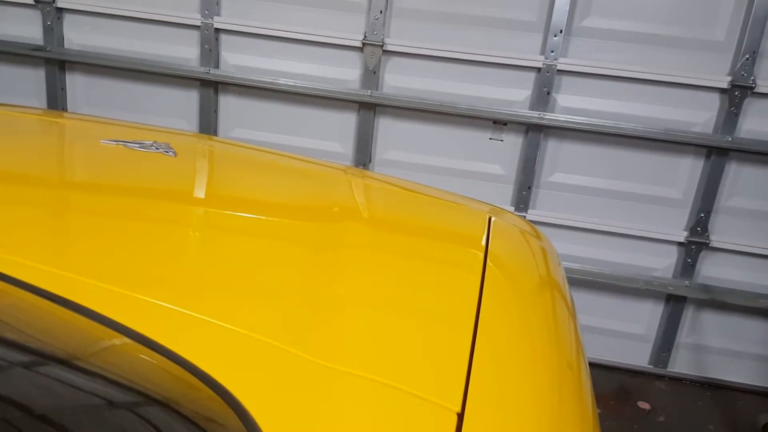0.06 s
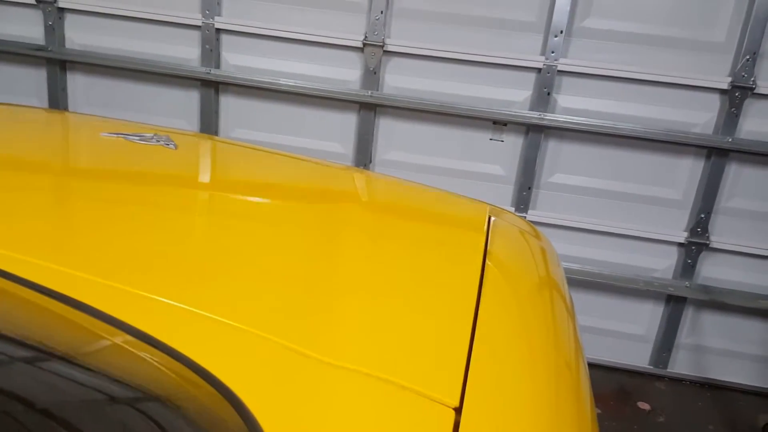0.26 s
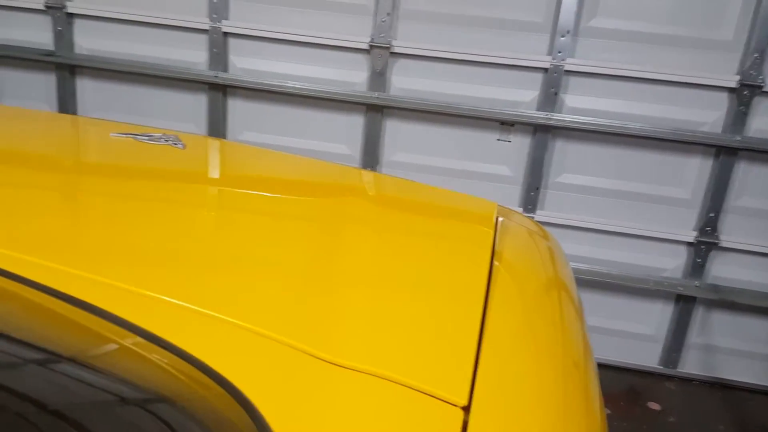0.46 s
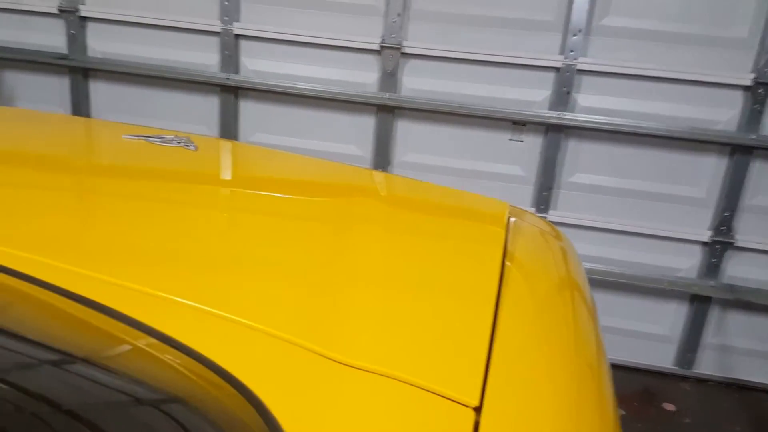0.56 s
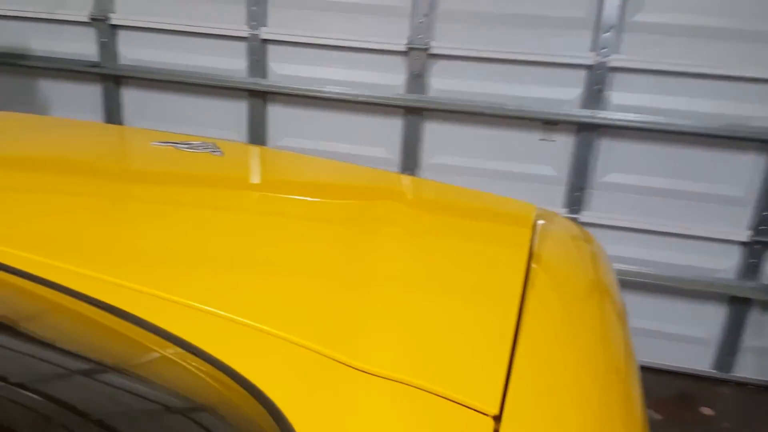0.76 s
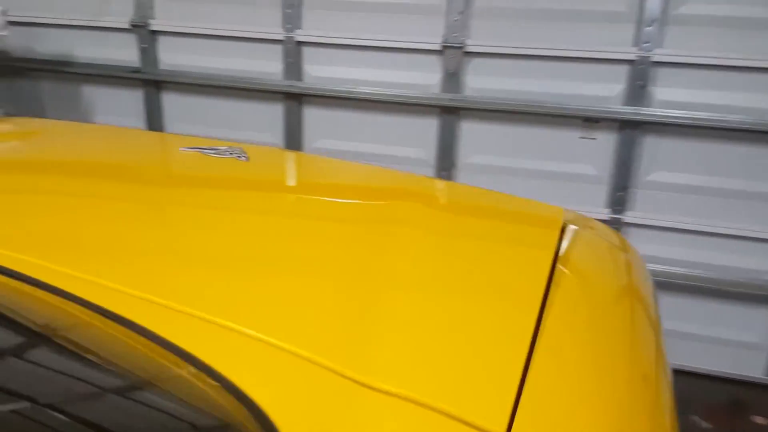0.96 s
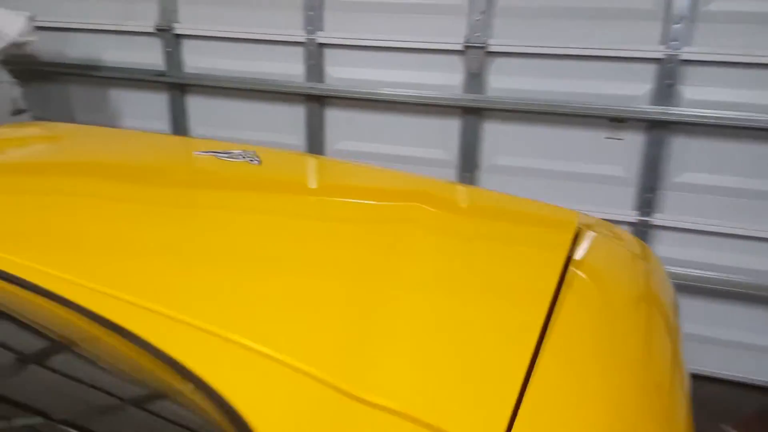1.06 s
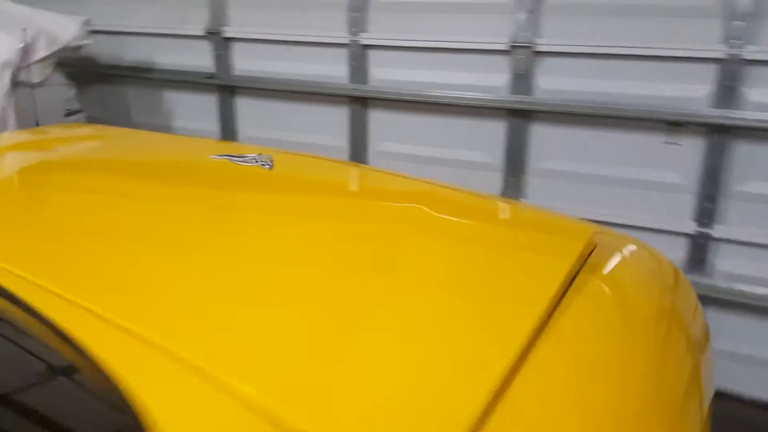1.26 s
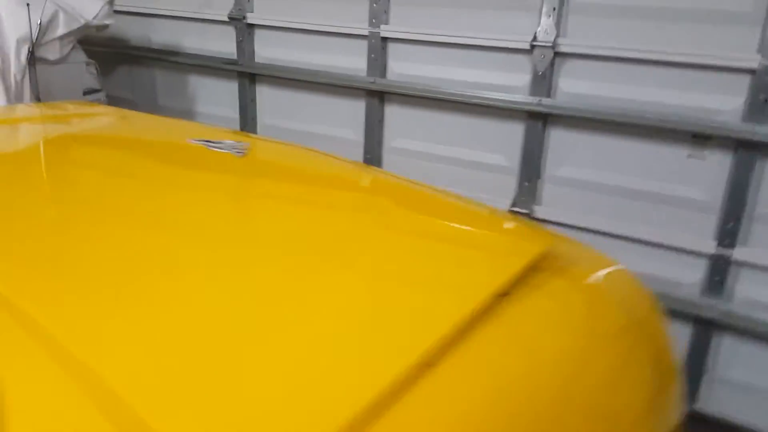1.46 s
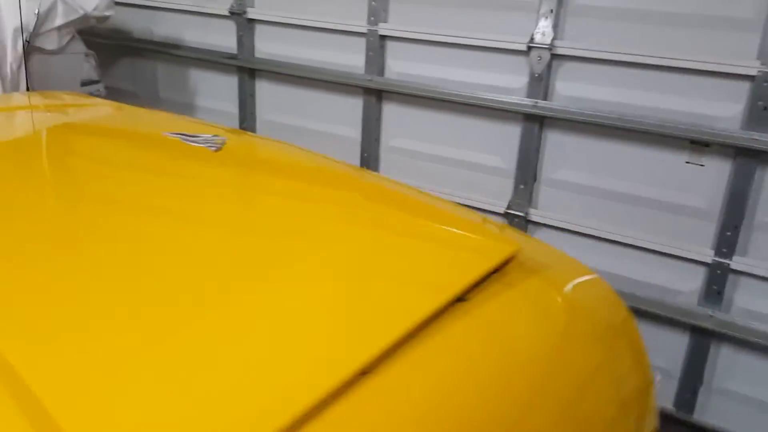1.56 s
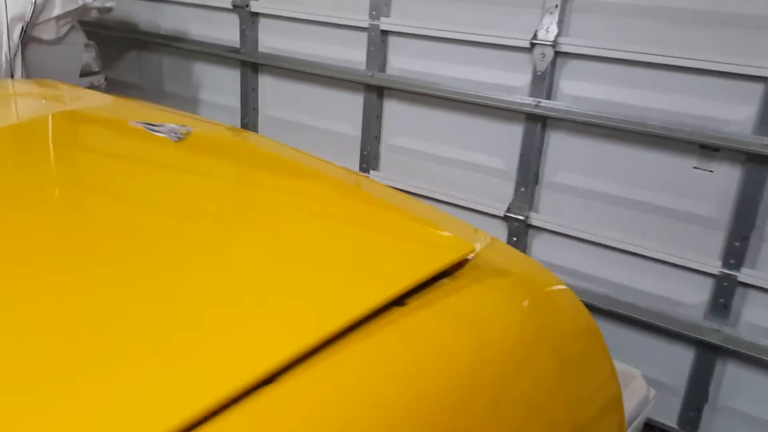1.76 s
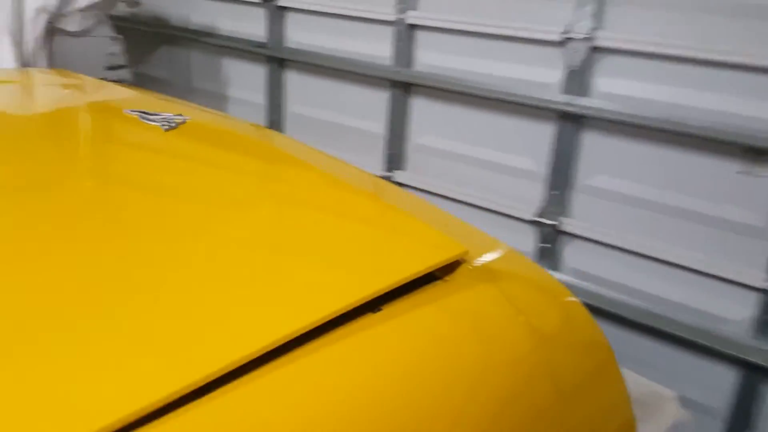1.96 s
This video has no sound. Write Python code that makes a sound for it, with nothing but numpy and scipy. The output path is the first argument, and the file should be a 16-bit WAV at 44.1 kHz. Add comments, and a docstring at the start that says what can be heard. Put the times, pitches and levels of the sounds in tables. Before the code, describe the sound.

A car trunk pops with a ringing metal clunk just after a brief electric whir. A few light taps and a second whir follow, echoing slightly in the garage, then only a low hum and faint clothing rustle.

```python
"""A car's trunk is released by its electric latch in a closed, quiet garage.
Over a low hum and a thin hiss, a relay ticks and a small geared motor pulls the latch.
The steel catch snaps open; the sheet-metal lid knocks and rings, and the trunk's air booms.
As the lid settles with a few taps, the gears run back. Then the hum swells, clothes rustle
faintly, and near the end the hiss stops with a click."""
import sys
import numpy as np
from scipy import signal
from scipy.fft import rfft, irfft
from scipy.io import wavfile

SR = 44100
rng = np.random.default_rng(int(sys.argv[2]) if len(sys.argv) > 2 else 0)


def wav_out(sig):
    """Save sig, one row per channel (or a flat mono array), as 16-bit PCM at SR to the path in sys.argv[1]."""
    wavfile.write(sys.argv[1], SR, np.round(np.clip(np.atleast_2d(sig).T, -1, 1) * 32767).astype(np.int16))


N = 88200
T = np.arange(N) / SR
BIN_HZ = np.arange(N // 2 + 1) * SR / N
LATCH_CHATTER_S = 0.0079


def catch():
    """Impact excitation: the steel catch snaps and rings; its cracks come mostly off the walls."""
    # snaps of the catch: start_s, level_db
    snaps = [(.240, -6.5), (.2465, -3.5), (.252, -2), (.2625, -2), (.280, -5.5)]
    # spectrum of a snap: frequency_hz, gain_db
    snap_colour = [(40, 7.5), (100, 24), (250, 8.5), (900, 11.5), (1200, 4), (2600, 4), (4300, -5.5),
                   (5300, -12.5), (6200, -4.5), (7000, -16), (7700, -4.5), (8500, -13.5), (9200, -21),
                   (12000, -21), (16000, -30.5)]
    # modes of the catch: pitch_hz, level_db, t60_s
    modes = [(1846, -45.5, 0.25), (2228, -46, 0.22), (2565, -40, 0.42), (2610, -44.5, .3),
             (3434, -44.5, 0.19), (4065, -54, 0.316), (6200, -65.5, 0.34), (7440, -58.5, .2)]
    crack = coloured(clicks(snaps), snap_colour)
    release = clicks([(snaps[1][0], 0)])  # the second snap excites the modes
    # each mode is slightly unequal in the two ears
    rings = sum(ringing(release, [mode]) * from_db(-0.5 * rng.standard_normal((2, 1))) for mode in modes)
    return from_db(-3.5) * chatter(crack, LATCH_CHATTER_S) + rings + garage(crack)


def lid():
    """Plate vibration: dull knocks against the stops set the sheet metal ringing in its modes."""
    # knocks of the lid: start_s, level_db, pitch_hz
    knocks = [(.2398, -19, 350), (.2465, -10.5, 780), (.2555, -19, 230), (.2612, -17, 390),
              (.277, -22, 200), (.2815, -15, 260), (.2955, -20, 410), (.322, -26, 560)]
    # modes of the panel: pitch_hz, relative_level_db, t60_s
    modes = [(92, -13, 0.22), (128.6, -21, 0.16), (194, -22, .3), (212, -24.5, 0.9), (314.4, -41.5, .4),
             (368, -29, 0.21), (445, -14.5, 0.17), (499.5, -13, 0.15), (620, -15.5, 0.27), (671, -26, 0.38),
             (808, -30, .3), (882, -31, .3)]
    t60_cycles, dull_above_hz = 5.6, 1310
    thuds = -sum(ring(clicks([(s, db)]), hz, t60_cycles / hz) for s, db, hz in knocks)
    thuds = signal.sosfilt(signal.butter(2, dull_above_hz, fs=SR, output="sos"), thuds)
    blows = clicks([(s, db) for s, db, hz in knocks])
    panel = -from_db(-6.5) * ringing(blows, modes)
    return thuds + panel + from_db(-3.5) * garage(thuds)


def trunk_boom():
    """Cavity resonance: the trunk's air booms as the seal lets go."""
    start_s, rise_s = .2445, 0.015
    swell = 1 - np.exp(-np.maximum(T - start_s, 0) / rise_s)
    return swell * ring(clicks([(start_s, -19.5)]), hz=59.5, t60_s=0.49)


def lid_taps():
    """Light impacts: the lid settles on its struts, and the garage reflects each tap."""
    # taps of the lid: start_s, level_db
    taps = [(.421, -12.5), (.464, -15.5), (.497, -9), (.545, -11.5), (.563, -11), (.851, -29)]
    # spectrum of a tap: frequency_hz, gain_db
    tap_colour = [(60, 1), (250, 7), (600, 2), (1000, 11), (1300, 2.5), (1700, -13), (3000, -28),
                  (15000, -53)]
    strikes = coloured(clicks(taps), tap_colour)
    return chatter(strikes, decay_s=.011) + from_db(-7) * garage(strikes)


def motor_pull():
    """Forced vibration: the gears shake their housing as the motor pulls the latch."""
    # effort of the pull: time_s, level_db
    effort = [(.166, -70), (.181, -42), (.204, -33.5), (.225, -35), (.245, -35), (.3, -83.5)]
    # response of the housing: frequency_hz, relative_gain_db
    colour = [(50, -16), (110, -0.5), (190, -1), (340, 8), (570, -4.5), (900, 10), (1300, -0.5), (2000, 3),
              (2700, 1.5), (4000, -17), (6000, -22), (8200, -35), (10000, -38), (16000, -42)]
    # modes of the housing: pitch_hz, gain_db, t60_s
    modes = [(329, -42, 0.063), (938, -27.5, 0.036), (2565, -36, 0.036)]
    return gears(effort, colour, modes, full_teeth_per_s=900)


def motor_return():
    """Forced vibration at a lower tooth rate: the gears run back."""
    # effort of the return: time_s, level_db
    effort = [(.5, -85), (.545, -50), (.572, -39), (.605, -40), (.635, -36), (.665, -39), (.71, -47),
              (.8, -74.5), (.83, -88)]
    # response of the housing: frequency_hz, relative_gain_db
    colour = [(40, -3), (70, 4.5), (200, 2), (320, 6.5), (420, -2), (560, -0.5), (900, 3), (1150, -1.5),
              (1350, 2), (1550, -1.5), (2100, 2.5), (2700, 1), (4300, -13), (6200, -18), (8200, -23),
              (9500, -36.5), (12000, -28.5), (16000, -50)]
    # modes of the housing: pitch_hz, gain_db, t60_s
    modes = [(301.4, -38, 0.072), (860, -36, 0.043), (1378, -34, 0.17), (1405, -45, 0.038)]
    return gears(effort, colour, modes, full_teeth_per_s=670)


def gears(effort_curve, colour, modes, full_teeth_per_s):
    """Gear mesh: teeth click unevenly over friction; effort makes them faster, louder and brighter."""
    rate_jitter, tooth_spread_db, friction_share, dull_above_hz = .2, 6, 0.46, 1300
    gain = level(effort_curve) * (T > effort_curve[0][0]) * (T < effort_curve[-1][0])
    effort = gain / gain.max()
    teeth_per_s = full_teeth_per_s * np.sqrt(effort) * (1 + rate_jitter * drift(700))
    teeth = np.diff(np.floor(np.cumsum(teeth_per_s) / SR), prepend=0)  # one impulse per tooth
    teeth *= from_db(tooth_spread_db * np.clip(rng.standard_normal(N), -2, 2))
    teeth *= rng.choice([-1, 1], N)
    friction = friction_share * rng.standard_normal(N)
    drive = gain * (.5 * np.sqrt(SR / full_teeth_per_s) * teeth + friction)
    dull = signal.sosfilt(signal.butter(1, dull_above_hz, fs=SR, output="sos"), drive)
    drive = dull + effort ** .6 * (drive - dull)  # the treble follows the effort
    impulse_response = coloured(clicks([(0, 0)]), colour)
    housing = coloured(drive, colour) / np.linalg.norm(impulse_response)
    return from_db(-0.5) * chatter(housing, LATCH_CHATTER_S) + garage(housing) + ringing(drive, modes)


def relay():
    """Free vibration: the relay that starts the motor rings after one impact."""
    # modes of the relay: pitch_hz, level_db, t60_s
    modes = [(657, -61, 0.079), (2970, -57, .08), (3314, -55.5, .06)]
    return ringing(clicks([(.1225, 0)]), modes)


def small_ticks():
    """Broadband transients: light ticks as the latch works, and one faint late tick amid the rustling."""
    # light ticks: start_s, level_db
    ticks = [(.1225, -30), (.463, -28), (.4945, -25.5), (.5612, -19), (1.678, -40.5)]
    # spectrum of a tick: frequency_hz, gain_db
    tick_colour = [(60, 17.5), (200, 15.5), (800, 8.5), (1800, 5), (3400, 5.5), (6000, -3), (8200, -4),
                   (10000, -15), (16000, -17)]
    strikes = coloured(clicks(ticks), tick_colour)
    return chatter(strikes, decay_s=0.0038) + from_db(3.5) * garage(strikes)


def clothes():
    """Friction noise: someone moves beside the car, with short rustles over a soft shuffle."""
    # rustles of cloth: centre_s, half_width_s, level_db
    rustles = [(1.396, 0.042, -65), (1.538, 0.035, -69), (1.677, 0.018, -77), (1.97, 0.03, -71)]
    # spectrum of a rustle: frequency_hz, relative_density_db
    rustle_colour = [(100, 0), (600, -24), (1900, 6), (5000, 0), (8200, 6.5), (10000, -6.5), (13000, 0.5),
                     (16000, -24)]
    # swell of the shuffle: time_s, level_db
    shuffle_level = [(1.1, -84.5), (1.35, -68.5), (1.5, -71), (1.68, -63.5), (1.85, -67), (2, -68.5)]
    # spectrum of the shuffle: frequency_hz, relative_density_db
    shuffle_colour = [(60, -3), (230, 3.5), (450, -7.5), (1800, -4), (4000, -13), (8000, -21.5),
                      (15000, -27.5)]
    swells = sum(from_db(db) * np.exp(-((T - s) / width) ** 2) for s, width, db in rustles)
    grain = from_db(2.36 * drift(120))
    return grain * (swells * noise(rustle_colour) + level(shuffle_level) * noise(shuffle_colour))


def hum():
    """Random modulation: a low tone wavers in pitch and level."""
    # swell of the hum: time_s, level_db
    hum_level = [(0, -67), (.9, -67.5), (1.1, -61), (1.27, -57), (1.5, -56), (1.58, -63.5), (1.72, -55),
                 (1.81, -59), (1.84, -71), (1.88, -56)]
    pitch_hz, waver_hz, waver_db = 70.4, 1.2, 1.24
    phase = 2 * np.pi * np.cumsum(pitch_hz + waver_hz * drift(10)) / SR
    return np.sqrt(2) * np.sin(phase) * level(hum_level) * from_db(waver_db * drift(5.3))


def hiss():
    """Band noise and a switching transient: a thin hiss ends in a quickly damped double click."""
    # spectrum of the hiss: frequency_hz, relative_density_db
    hiss_colour = [(500, -59), (2200, -11), (2800, -6.5), (3150, -2.5), (3600, -6.5), (4500, -18.5),
                   (15000, -33)]
    # clicks that end the hiss: start_s, level_db
    stop_clicks = [(1.8145, -33), (1.819, -25)]
    # modes the clicks excite: pitch_hz, gain_db, t60_s
    stop_modes = [(850, -24, .012), (2700, -25.5, .004), (3230, -27, 0.0078)]
    end_s = 1.82
    return from_db(-68.5) * noise(hiss_colour) * (T < end_s) + ringing(clicks(stop_clicks), stop_modes)


def still_air():
    """Ambient noise: the garage's steady floor, strongest in the bass."""
    # spectrum of the still air: frequency_hz, relative_density_db
    air_colour = [(25, -8.5), (60, 3.5), (110, 2.5), (220, -6.5), (400, -16.5), (1000, -16.5),
                  (2000, -22.5), (5000, -33.5), (8000, -27.5), (10000, -40.5), (15000, -27)]
    return from_db(-64.5) * noise(air_colour)


def garage(x):
    """Reverberation: dense reflections build up quickly and die away, each octave at its own rate."""
    # reverberation time of the garage: frequency_hz, t60_s
    decay_times = [(60, 0.7), (250, 0.4529), (1000, 0.502), (3000, 0.54), (8000, .5), (15000, 0.62)]
    build_s, centres_hz = 0.002, np.geomspace(60, 15360, 9)
    field = rfft(diffuse())
    tail = 0
    for centre, share in zip(centres_hz, np.eye(len(centres_hz))):
        band = irfft(field * at_hz(np.c_[centres_hz, share], BIN_HZ), N)
        tail = tail + band * from_db(-60 * T / at_hz(decay_times, centre))
    return spread(x, tail * (1 - np.exp(-T / build_s)))


def diffuse():
    """Diffuse field: white noise from all around, alike at both ears in the bass, unrelated above."""
    # likeness of left and right: frequency_hz, coherence
    likeness = [(60, 1), (290, 0.83), (640, 0.45), (1400, 0.017), (15000, 0)]
    # balance between the ears: frequency_hz, left_minus_right_db
    balance = [(400, 0.5), (1300, 0.5), (2400, -1.5), (4400, -6.5), (6300, -1), (8100, 3), (15000, 0)]
    mid, side = rfft(rng.standard_normal((2, N)))
    coherence = np.clip(at_hz(likeness, BIN_HZ), -1, 1)
    sides = np.array([[1], [-1]])
    pair = np.sqrt(1 + coherence) * mid + sides * np.sqrt(1 - coherence) * side
    return rms_one(irfft(pair * from_db(sides * at_hz(balance, BIN_HZ) / 2), N))


def noise(spectrum):
    """Spectral shaping: diffuse noise of a given colour, rms 1."""
    return rms_one(coloured(diffuse(), spectrum))


def chatter(x, decay_s):
    """Contact chatter: touching parts rattle briefly, which spreads each impact in time."""
    return spread(x, diffuse() * np.exp(-T / decay_s))


def spread(x, response):
    """Convolution with a stereo impulse response scaled to unit energy."""
    return signal.fftconvolve(x[None], rms_one(response) / np.sqrt(N), axes=1)[:, :N]


def ringing(x, modes):
    """Modal superposition: the sum of the resonances that x excites."""
    return sum(ring(x, hz, t60_s) * from_db(db) for hz, db, t60_s in modes)


def ring(x, hz, t60_s):
    """Damped oscillator: a unit impulse starts a decaying sine of height 1."""
    radius, angle = from_db(-60 / (t60_s * SR)), 2 * np.pi * hz / SR
    return signal.lfilter([0, np.sin(angle)], [1, -2 * radius * np.cos(angle), radius ** 2], x + 1e-18)


def coloured(x, spectrum):
    """Minimum-phase filter: a causal response from rows of frequency_hz, gain_db."""
    gain = from_db(at_hz(spectrum, np.arange(N + 1) * SR / (2 * N)))
    cepstrum = irfft(np.log(gain))
    cepstrum[1:N] *= 2  # fold onto positive time
    cepstrum[N + 1:] = 0
    return irfft(rfft(x, 2 * N) * np.exp(rfft(cepstrum)))[..., :N]


def clicks(rows):
    """Ideal impacts: one impulse for each row of start_s, level_db."""
    impulses = np.zeros(N)
    for s, db in rows:
        impulses[int(s * SR)] += from_db(db)
    return impulses


def drift(points_per_s):
    """Random fluctuation: a line through 400 Gaussian points that holds the last."""
    points = rng.standard_normal(400)
    return np.interp(T * points_per_s, np.arange(len(points)), points)


def level(rows):
    """Amplitude envelope from rows of time_s, level_db."""
    return from_db(np.interp(T, *np.transpose(rows)))


def at_hz(rows, hz):
    """Interpolation on a log-frequency axis."""
    row_hz, value = np.transpose(rows)
    return np.interp(np.log(np.maximum(hz, 1)), np.log(row_hz), value)


def rms_one(x):
    """Normalisation to rms 1."""
    return x / np.sqrt(np.mean(x ** 2) + 1e-20)


def from_db(db):
    """Decibels to amplitude ratio."""
    return 10 ** (np.asarray(db) / 20)


def scene():
    """Superposition: the latch cycle adds to the garage's background."""
    actuator = relay() + motor_pull() + motor_return()
    impacts = lid_taps() + small_ticks() + catch() + lid()
    background = hum() + still_air() + hiss() + clothes()
    return actuator + impacts + trunk_boom() + background


def record(dry):
    """Band limiting: a steep low-pass cuts the highest treble."""
    cutoff_hz = 15800
    return signal.sosfilt(signal.ellip(12, .1, 90, cutoff_hz, fs=SR, output="sos"), dry)


dry = scene()
out = record(dry)
wav_out(out)
```